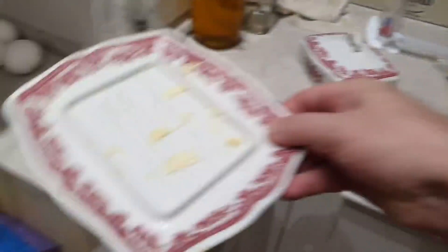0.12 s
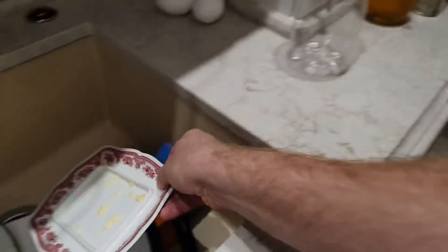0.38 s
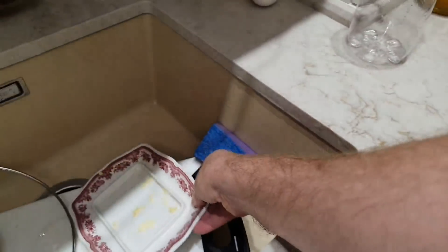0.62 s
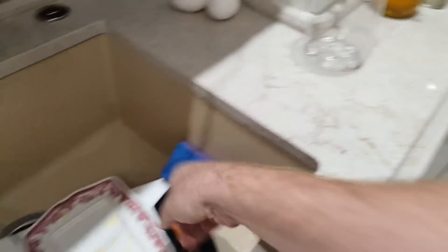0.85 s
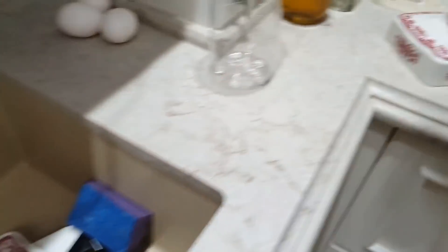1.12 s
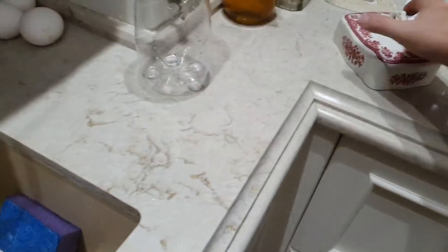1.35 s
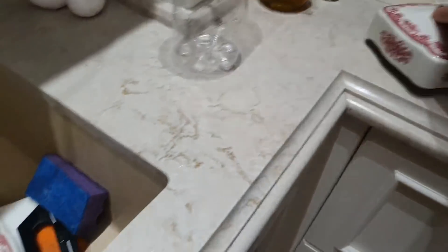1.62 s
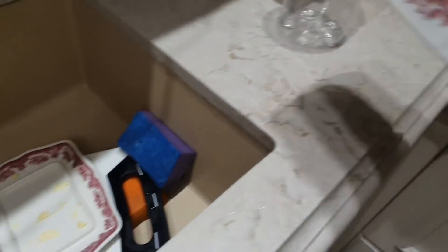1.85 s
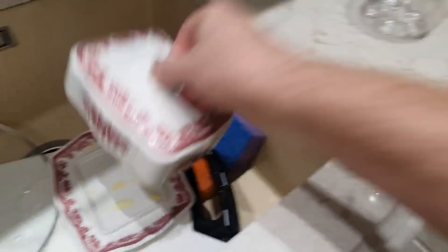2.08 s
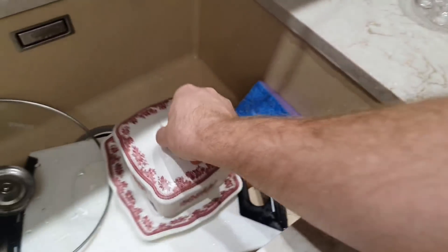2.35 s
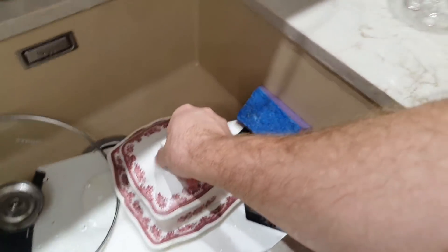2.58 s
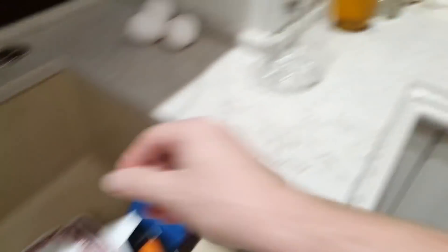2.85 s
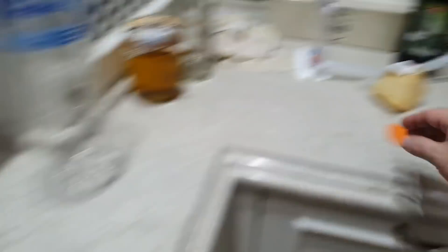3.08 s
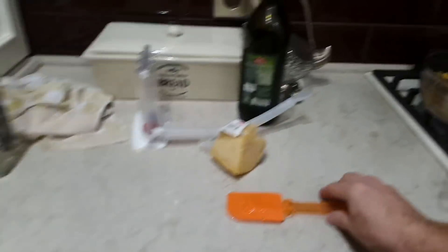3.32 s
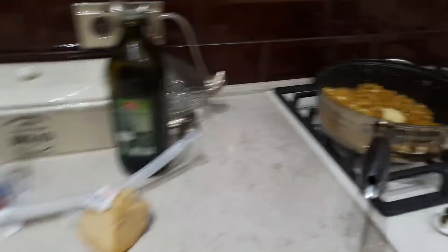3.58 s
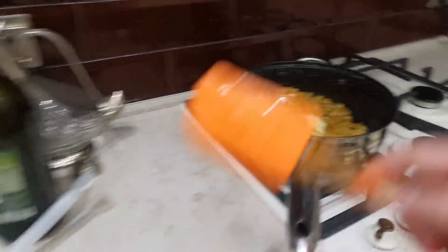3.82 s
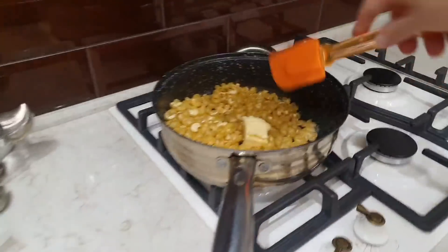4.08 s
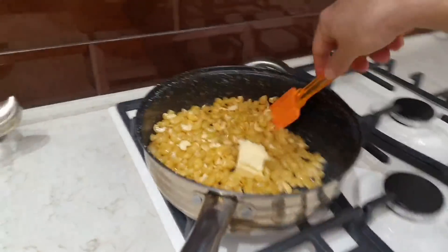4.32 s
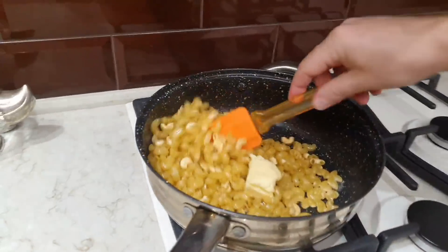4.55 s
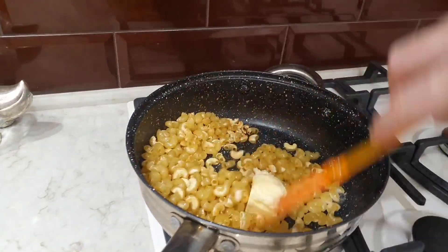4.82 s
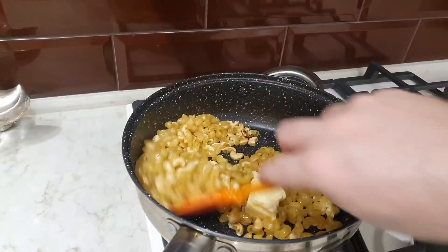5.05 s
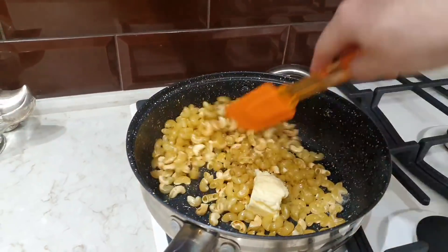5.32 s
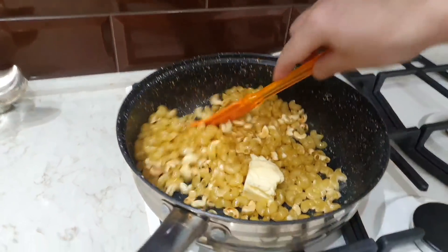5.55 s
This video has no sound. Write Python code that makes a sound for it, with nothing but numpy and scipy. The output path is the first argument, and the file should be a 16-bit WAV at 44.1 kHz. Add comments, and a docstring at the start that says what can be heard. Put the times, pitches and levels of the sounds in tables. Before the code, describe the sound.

Crockery goes down first: a double clunk of a tray in a hollow sink, a pause, then a brighter cluster of lid clanks. Faint hiss and low rumble continue throughout. Light scuffs lead to the stove, where butter crackles and a spatula scrapes and knocks a ringing pan, tumbling dry pasta. Near microphone, short indoor echoes.

```python
"""A ceramic butter tray, then its lid, are set down in a sink: struck modes over a booming base, in stereo.
A spatula knocks on a steel pan (slowly built ringing) and stirs dry pasta (clouds of tiny clicks).
Butter sizzles (fluttering noise, flares) and spits (short sprays) over a gas flame (shaped noise).
Thumps, a wavering hum, a low rumble near the pan, the lid lifted off the counter and a hand and spatula
brushing it (noise swells) lie behind; a room answers the knocks."""
import sys
import numpy as np
from scipy import signal
from scipy.fft import rfft, irfft, next_fast_len
from scipy.io import wavfile
from scipy.ndimage import uniform_filter1d

SR = 44100
rng = np.random.default_rng(int(sys.argv[2]) if len(sys.argv) > 2 else 0)


def put_to_file(sound):
    """Save the sound as 16-bit audio at rate SR, in the file named by the first command-line argument."""
    columns = np.atleast_2d(sound).T  # one column per channel
    safe = np.clip(columns, -1, 1)
    whole_steps = np.round(safe * 32767)
    wavfile.write(sys.argv[1], SR, whole_steps.astype(np.int16))


def ratio(d):
    """dB to gain"""
    e = np.asarray(d, float) / 20
    return 10 ** e


N = 250399
t = np.arange(N) / SR
HALF_S = SR // 2  # samples in the half second that a blow or the room may ring

# ringing modes of the steel pan: (frequency [Hz], relative level [dB], t60 [s])
PAN_MODES = [(1280, -11.5, 0.34), (1620, -12.5, 0.26), (1808, -5.5, 0.18), (2257, -12, 0.16),
             (2330, -3, 0.17), (2678, -14, 0.12), (3251, -17, 0.11), (3192, -9, 0.65), (3467, -2, 0.43),
             (3440, -10, 0.25), (3921, -6, 0.31), (3967, 3, 0.13), (4500, -14, .2), (4280, -13, 0.049),
             (4700, -31.5, .12), (5040, -19, 0.073), (6160, -23, 0.085), (5860, 5.5, 0.099),
             (6148, -23, .09), (6390, 8, 0.057), (6650, -12, 0.067)]


def curve(table):
    """Table columns joined by straight lines in time; 30 dB down outside a table that starts late or ends early."""
    s, *columns = np.transpose(table)
    before_db, after_db = 30 * (s[0] > 0.1), 30 * (s[-1] < 5.5)
    return [np.interp(t, s, c, left=c[0] - before_db, right=c[-1] - after_db) for c in columns]


def unit(x):
    """Scale to rms 1."""
    return x / np.sqrt(np.mean(x ** 2))


def colour(x, tone):
    """Filter by (frequency [Hz], gain [dB]) points, joined over log frequency."""
    n = next_fast_len(N)
    hz, db = np.transpose(tone)
    bin_hz = np.arange(n // 2 + 1) * SR / n
    gain = ratio(np.interp(np.log(bin_hz + 1), np.log(hz), db))
    return irfft(rfft(x, n) * gain, n)[..., :N]


def band(x, hz, below=2.4, above=1.66):
    """Gentle band-pass from hz / below to hz * above."""
    edges_hz = [hz / below, min(hz * above, 20000)]
    return signal.sosfilt(signal.butter(1, edges_hz, "band", fs=SR, output="sos"), x)


def walk(rate_hz):
    """Random levels held 1 / rate_hz and slewed twice; spread near 1."""
    k = int(SR / rate_hz)
    held = np.repeat(rng.standard_normal(N // k + 1), k)
    return 0.53 * uniform_filter1d(uniform_filter1d(held, k), k)[:N]


def swell(at_s, length_s, db):
    """Gain that rises, holds and dies away."""
    attack_s, release_s = 0.015, 0.036
    s = t - at_s
    return ratio(db) * np.clip(s / attack_s, 0, 1) * np.exp(-np.maximum(s - length_s, 0) / release_s)


def diffuse(x, alike_hz=410.0):
    """Two unrelated signals become left and right, alike only in the bass."""
    high = signal.butter(N=3, Wn=alike_hz, btype="high", fs=SR, output="sos")
    side = signal.sosfilt(high, x[1]) + 0.12 * x[1]
    return np.array([x[0] + side, x[0] - side])


def grains(per_s, spread_db, grain_s=0.0042):
    """Scattered bursts of noise, many small and a few large, heard at both ears."""
    size = ratio(spread_db * np.minimum(rng.exponential(size=N), 5))
    starts = (rng.random(N) < per_s / SR) * size
    envelope = signal.lfilter([1], [1, -np.exp(-1 / (grain_s * SR))], starts)
    return envelope * rng.standard_normal((2, N))


def haze(t60_s):
    """The many small modes too close to tell apart: a dying noise, unlike at the two ears."""
    return diffuse(rng.standard_normal((2, HALF_S))) * 1000 ** (-t[:HALF_S] / t60_s)


def ring(modes, favoured_hz, boost_db=12.5, spread=0.051):
    """Struck modes: the spot favours those near one pitch, stirs the rest unevenly; pitches vary at random."""
    hz, db, t60_s = np.transpose(modes)[:, :, None]
    s = t[:HALF_S]
    uneven_db = 4 * rng.standard_normal(db.shape)
    hz = hz * (1 + 0.003 * rng.standard_normal(hz.shape))
    near = np.exp(-(np.log(hz / favoured_hz) / spread) ** 2)
    db = db + boost_db * near + uneven_db * (1 - near)
    decay = np.exp(-np.log(1000) * s / np.clip(t60_s, 0.01, 2))
    return np.sum(ratio(db) * decay * np.sin(2 * np.pi * hz * s), axis=0)


def blow(at_s, db, modes, cloud, hz, rise_s, base=0.0, crack=2.4, below=3.64, above=1.454):
    """A crack, then the ring builds as the surfaces settle; the contact colours it, the base answers too."""
    s = t[:HALF_S]
    rise = 1 - np.exp(-s / max(rise_s, 1e-4))
    rough = rise * cloud + crack * (s == 0)
    rough = band(band(rough, hz, below, above), hz, below, above)
    sound = band(rise * modes + rough, hz, 1.9, 2.32) + rise * base
    first_20_ms = sound[:, :SR // 50]
    out, i = np.zeros((2, N + SR)), int(at_s * SR)
    out[:, i:i + len(s)] = ratio(db) * sound / np.sqrt(np.mean(first_20_ms ** 2))
    return out[:, :N]


def thumps():
    """Deep thumps: swells of low noise, the same at both ears."""
    # (time [s], length [s], level [dB])
    thump_rows = [(.04, .03, -65), (0.166, 0.027, -58), (0.309, 0.038, -42.5), (0.524, 0.097, -36.5),
                  (0.773, 0.11, -36), (0.966, .03, -48), (1.063, .03, -48.5), (1.263, .03, -51)]
    tone = [(25, -31), (50, -6), (65, 8.5), (85, 1), (120, -4.5), (200, -45)]
    return sum(swell(*row) for row in thump_rows) * unit(colour(rng.standard_normal(N), tone))


def hum():
    """A low sine whose pitch and level waver."""
    # (time [s], level [dB])
    hum_rows = [(1.35, -62), (1.67, -56), (2.12, -58), (2.41, -48.5), (2.88, -52), (3.16, -55), (3.94, -59),
                (4.1, -81)]
    centre_hz, wander_hz = 67, 2.6
    hz = centre_hz + wander_hz * unit(walk(6.6))
    level_db = curve(hum_rows)[0] + 0.73 * walk(10.0)
    return np.sqrt(2) * ratio(level_db) * np.sin(2 * np.pi * np.cumsum(hz) / SR)


def low_rumble():
    """A steady low rumble near 150 Hz, heard close to the pan: narrow noise, the same at both ears."""
    tone = [(90, -31.0), (140, 2.5), (170, 1.5), (260, -34.0), (500, -72.5)]
    from_s, level_db, waver_db = 4.2, -50, 0.5
    noise = unit(colour(rng.standard_normal(N), tone))
    return swell(from_s, N / SR, level_db) * ratio(waver_db * walk(6.7)) * noise


def counter_contacts():
    """Lid lifted off the counter (dull thumps), then hand and spatula brushing it: grains as hiss and dull rub."""
    # first two rows the lid, then the brushing: (time [s], length [s], hiss level [dB], dull rub level [dB])
    contact_rows = [(1.428, 0.031, -60, -51), (1.525, 0.017, -57.5, -55), (3.126, 0.044, -52.5, -80),
                    (3.381, 0.093, -46.5, -68), (3.526, .03, -52, -51.5), (3.571, 0.078, -45, -82),
                    (4.049, 0.041, -52, -50.5)]
    hiss_tone = [(600, -11), (1500, -4.5), (3500, -2.5), (6000, -9.5), (14000, -14)]
    rub_tone = [(150, -17), (300, 4), (600, 5), (1000, -10), (2500, -41)]
    hiss = diffuse(unit(colour(grains(4500, 0.92), hiss_tone)))
    rub = diffuse(unit(colour(grains(1300, 2.0), rub_tone)))
    return sum(swell(s, n, hiss_db) * hiss + swell(s, n, rub_db) * rub for s, n, hiss_db, rub_db in contact_rows)


def flame():
    """Gas flame roar and room rumble: shaped noise that swells slowly and flutters."""
    # noise spectrum: (frequency [Hz], relative density [dB per Hz])
    flame_tone = [(15, -69.5), (25, -27), (50, -0.5), (64, -5), (80, 2), (92, -1.5), (124, -12.5),
                  (158, -2.5), (188, -8), (377, -13), (535, -18.5), (731, -16), (885, -5.5), (1150, -19),
                  (1600, -24), (2080, -69), (3520, -120)]
    # swell of flame and room rumble: (time [s], gain [dB])
    flame_swell = [(0, 7), (.4, 4), (1.2, 0), (2.2, 0.5), (3.2, -0.5), (4.2, 5), (5.68, 11)]
    gain_db = -57 + curve(flame_swell)[0] + 1.5 * walk(7.2)
    return ratio(gain_db) * diffuse(unit(colour(rng.standard_normal((2, N)), flame_tone)))


def sizzle():
    """Fine fizz of butter over a fluttering hiss; it flares brighter as turned pasta meets hot butter."""
    # the head turns from the pan and back: (time [s], level [dB])
    sizzle_rows = [(0.0, -47.5), (0.3, -48), (0.7, -55), (0.99, -50), (1.25, -54.5), (1.72, -55.5),
                   (2.39, -52), (2.85, -52), (3.62, -53), (3.81, -52.5), (4.02, -52.5), (5.68, -49)]
    # noise spectrum: (frequency [Hz], relative density [dB per Hz])
    sizzle_tone = [(710, -48), (1200, -15.5), (1490, -4), (2110, -9), (2790, -5.5), (4360, -3), (6030, -7),
                   (6720, -7.5), (14800, -8), (16000, -23)]
    # (time [s], length [s], level [dB])
    flare_rows = [(4.534, 0.036, -40), (4.68, 0.039, -36.5), (5.206, 0.03, -42.5), (5.394, 0.04, -36)]
    flare_tone = [(3000, -30), (7000, -7), (11000, 3), (14800, 0), (16000, -30)]
    fizz = rng.standard_normal((2, N)) + 0.5 * unit(grains(200, 3, 0.0015))
    fizz = diffuse(unit(colour(fizz, sizzle_tone)))
    flare = diffuse(unit(colour(grains(3000, 2.5, 0.002), flare_tone)))
    level_db = curve(sizzle_rows)[0] + 3.5 * walk(7.12)
    return ratio(level_db) * fizz + flare * sum(swell(*row) for row in flare_rows)


def spits_and_tick():
    """Bursting butter drops, and at 4.16 s a broadband tick of the spatula touching the pan: click and spray."""
    # the two rows near 4.16 s are the tick: (time [s], level [dB], brightest frequency [Hz])
    spit_rows = [(.272, -51, 9600), (1.024, -51, 5300), (1.182, -50, 4500), (3.035, -52, 4700),
                 (3.133, -44.5, 8050), (3.406, -51, 7040), (3.874, -48.5, 3940), (3.92, -49.5, 10500),
                 (4.012, -51.5, 7260), (4.125, -44, 10100), (4.158, -34, 5830), (4.159, -44.5, 2170),
                 (4.3, -40.5, 3800), (4.367, -34.5, 10800), (4.859, -46, 5960), (5.109, -40.5, 5730),
                 (5.226, -35, 11500), (5.603, -43, 7950)]
    return sum(blow(s, db, 0.0, 0.46 * haze(0.0094), hz, 0.00015, crack=1.9, below=1.7, above=1.44)
               for s, db, hz in spit_rows)


def stirring():
    """Dry pasta tumbles: dense clicks, heard directly and through the pan's ring."""
    # (time [s], rattle level [dB], share of the pan's ring [dB])
    stir_rows = [(4.04, -72, -10), (4.176, -54, -27), (4.224, -44.5, -15), (4.512, -32.5, -7.5),
                 (4.58, -35.5, -10), (4.70, -33, -2), (4.784, -38.5, -23), (4.862, -41, -19),
                 (4.932, -38, -9), (5.058, -37, -4), (5.23, -34, -7.5), (5.386, -37, -0.5),
                 (5.544, -31, -8.5), (5.678, -41, -17)]
    # rattle spectrum: (frequency [Hz], relative density [dB per Hz])
    rattle_tone = [(150, -22), (250, -8), (698, -8), (938, -3.5), (1040, -12.5), (1160, -1), (1470, -7),
                   (3340, -1.5), (5200, -9.5), (6200, -9), (8000, -16), (11100, -16), (14900, -22.5),
                   (16000, -25)]
    rattle_db, ring_db = curve(stir_rows)
    clicks = grains(1700, 2.8, 0.0025) * ratio(1.4 * walk(25))
    direct = unit(colour(clicks, rattle_tone))
    pan_answer = band(band(ring(PAN_MODES, 2110), 2700.0, above=1.3), 2500.0, above=1.25)
    rung = unit(signal.fftconvolve(clicks, pan_answer[None])[:, :N])
    return ratio(rattle_db) * diffuse(direct + ratio(ring_db) * rung, 1470.0)


def spatula():
    """The spatula knocks and scrapes the pan wall, whose high modes crowd together."""
    # (time [s], level [dB], brightest frequency [Hz], build-up time [s], favoured mode [Hz])
    pan_blows = [(4.465, -31.5, 3900, 0.0085, 3967), (4.506, -54, 3880, 0.0092, 3967),
                 (4.546, -16.5, 4540, 0.002, 5900), (4.563, -24.5, 4280, 0.0081, 3967),
                 (4.599, -32, 3960, .005, 3967), (4.63, -29, 4630, 0.0095, 3192),
                 (4.655, -38, 3960, .005, 3967), (4.691, -26.5, 5740, 0.0084, 2330),
                 (4.73, -31.5, 3980, 0.0038, 3967), (4.891, -36, 2550, 0.00098, 1280),
                 (5.18, -29, 3650, 0.0088, 1620), (5.347, -28.5, 5700, 0.0035, 6148),
                 (5.413, -19.5, 4540, 0.0016, 2330), (5.449, -22.5, 7350, 0.00037, 6650)]

    def knock_pan(s, db, hz, rise_s, spot_hz):
        """One blow: pan modes and two hazes, broad and crowded."""
        modes = ring(PAN_MODES, spot_hz, boost_db=15.0, spread=0.026)
        cloud = 5.0 * haze(0.082) + 15.6 * band(haze(0.11), 6050.0, 1.01, 1.08)
        return blow(s, db, modes, cloud, hz, rise_s)
    return sum(knock_pan(*row) for row in pan_blows)


def knock(modes, sink_hz, cloud, s, db, sink_db, hz, spot_hz):
    """A dish strikes sink or worktop: its modes, a dense clank near the favoured pitch, the base booming along."""
    # ringing modes of the sink: (frequency [Hz], relative level [dB], t60 [s])
    sink_modes = [(61.7, 2.5, 0.82), (143.4, -14.5, 0.52), (221, -12.5, 0.38), (258.8, -12.5, 0.4),
                  (364, -18.5, 0.29), (420, -8, 0.18), (511, -8, 0.14), (537.7, -7, 0.18), (640, -7, 0.14),
                  (748, -6.5, 0.2), (950, -20, 0.61)]
    held_db_per_s, halfway_db = -250, -27  # light touches stay in contact and die sooner
    held = ratio(held_db_per_s * t[:HALF_S] / (1 + ratio(db - halfway_db) ** 2))
    clank = band(haze(0.055), spot_hz, 1.105, 1.08)
    sink = ring(sink_modes, spot_hz) + 2.4 * haze(0.35) + 7.4 * clank
    sink = band(band(sink, sink_hz, above=1.5), sink_hz, 1.52, 5.5)
    base = ratio(sink_db) * held * sink
    dish = held * (ring(modes, spot_hz) + 5.1 * clank)
    return blow(s, db, dish, held * cloud * haze(0.14), hz, rise_s=0.00075, base=base, crack=14.0)


def lid():
    """The ceramic lid's blows; the base booms higher than under the tray."""
    # ringing modes: (frequency [Hz], relative level [dB], t60 [s])
    lid_modes = [(1125, 13, 0.049), (1590, -18, 0.051), (1764, 5.5, 0.11), (1970, 3, 0.17),
                 (1970, 2.5, 0.21), (2335, 9, 0.12), (2715, 7, 0.16), (2995, 4.5, 0.31),
                 (3255, 12.5, 0.092), (3343, 0.5, 0.29), (3600, 20.5, 0.023), (3860, 12.5, 0.032),
                 (4130, 12, 0.055), (4230, 4, 0.043), (4870, -4, 0.084), (5040, 10, 0.056), (5290, 1, 0.11),
                 (5750, -9, 0.18), (5770, -14, 0.29), (6481, -17, 0.086), (6950, -1, 0.24),
                 (7170, -1, 0.088), (7682, -20, 0.18), (9040, -5, 0.079), (8974, -9, 0.4), (9448, -25, .22),
                 (9960, -1, 0.11), (10700, -2, .16), (11500, -12, 0.15), (11000, 4, 0.21),
                 (12000, -16, 0.11), (12660, -6, .16), (13260, -7, .07), (14870, -5, 0.17)]
    # (time [s], level [dB], sink share [dB], brightest frequency [Hz], favoured mode [Hz])
    lid_blows = [(1.543, -54, 11, 500, 420), (2.341, -17, 10.5, 2140, 1125),
                 (2.349, -18.5, 8.5, 2840, 2335), (2.46, -21, 14.5, 2550, 3343), (2.498, -15, 8, 1720, 511),
                 (2.505, -16.5, -22, 3700, 4130), (2.53, -44, 8, 2580, 511), (2.686, -39.5, -9, 1520, 1125),
                 (2.698, -25.5, 20.5, 2300, 425), (2.7155, -24.5, -15, 4100, 3343),
                 (2.7971, -12.5, 7.5, 3660, 5040), (2.800, -23.5, 14.5, 2970, 427)]
    return sum(knock(lid_modes, 455.0, 13.0, *row) for row in lid_blows)


def tray():
    """The ceramic tray's blows; the base booms deep."""
    # ringing modes: (frequency [Hz], relative level [dB], t60 [s])
    tray_modes = [(1207, 7, 0.12), (1340, 5.5, 0.13), (1438, 4, 0.056), (1556, -1, 0.1),
                  (1744, -1.5, 0.067), (1926, 9.5, 0.14), (2000, 1.5, 0.12), (2240, 1, 0.17),
                  (2400, 17, 0.019), (2690, -7, 0.28), (2830, 4, 0.18), (3192, 8.5, 0.063), (3430, 2, 0.08),
                  (3530, -8, 0.22), (4160, 1, 0.057), (3800, -4, 0.064), (4700, -12, 0.19),
                  (4470, -20, 0.14), (5200, -29, 0.21), (5900, -27, 0.05), (6470, -30, 0.34),
                  (7200, -31, 0.35)]
    # (time [s], level [dB], sink share [dB], brightest frequency [Hz], favoured mode [Hz])
    tray_blows = [(0.5024, -14, 6.5, 1600, 221), (0.597, -27, 22.5, 3430, 511),
                  (0.717, -32.5, 34, 1680, 1556), (0.7397, -23.5, 11, 1310, 640),
                  (0.7592, -14.5, 8.5, 2330, 1744), (0.773, -22, 8, 1790, 1556),
                  (0.7796, -23.5, 20, 2560, 221), (0.809, -22, 0, 3400, 3192), (0.818, -26, 6, 3800, 3192),
                  (.83, -41, 10, 3040, 2690)]
    return sum(knock(tray_modes, 310.0, 9.7, *row) for row in tray_blows)


def room(x):
    """Decaying echoes, different at each ear, treble dying first."""
    t60_s, treble_t60_s, split_hz = 0.34, 0.14, 3000
    s = t[:HALF_S]
    noise = rng.standard_normal((2, len(s)))
    low = signal.sosfilt(signal.butter(1, split_hz, fs=SR, output="sos"), noise)
    tail = low * 1000 ** (-s / t60_s) + (noise - low) * 1000 ** (-s / treble_t60_s)
    tail = diffuse(tail * np.minimum(s / 0.0005, 1))
    return signal.fftconvolve(x[None], tail / np.sqrt(np.sum(tail ** 2) / 2))[:, :N]


def place(x, pan_db, count):
    """Direct sound: left louder by pan_db and later by count samples (negative: right later)."""
    left = ratio(pan_db / 2) * np.roll(x[0], max(count, 0))
    right = ratio(-pan_db / 2) * np.roll(x[1], max(-count, 0))
    return np.array([left, right])


def scene():
    """All sources, placed, with the room's answer to the knocks, spits and tick."""
    dish_tray, dish_lid, pan, drops = tray(), lid(), spatula(), spits_and_tick()
    near = place(dish_tray, 2.3, count=-7) + place(dish_lid, 2.1, count=-3)
    near = near + place(pan + drops, 1.0, count=-3)
    to_room = ratio(-5.0) * (dish_tray + dish_lid)[0] + ratio(-1.5) * pan[0] + ratio(0.5) * drops[0]
    bed = stirring() + sizzle() + flame() + counter_contacts() + low_rumble() + hum() + thumps()
    bed_balance_db = np.array([[0.6], [-0.6]])  # left, right
    return near + room(to_room) + bed * ratio(bed_balance_db)


def roll_off(x):
    """The treble ends steeply here."""
    return signal.sosfilt(signal.butter(12, 16670, fs=SR, output="sos"), x)


def record(dry):
    """The loudest peaks are rounded off and the top is cut."""
    ceiling, cut_hz = 1.3, 15700
    rounded = ceiling * np.tanh(dry / ceiling)
    mix = signal.sosfilt(signal.ellip(8, 0.2, 60, cut_hz, fs=SR, output="sos"), rounded)
    return roll_off(mix)


dry = scene()
out = record(dry)
put_to_file(out)
```